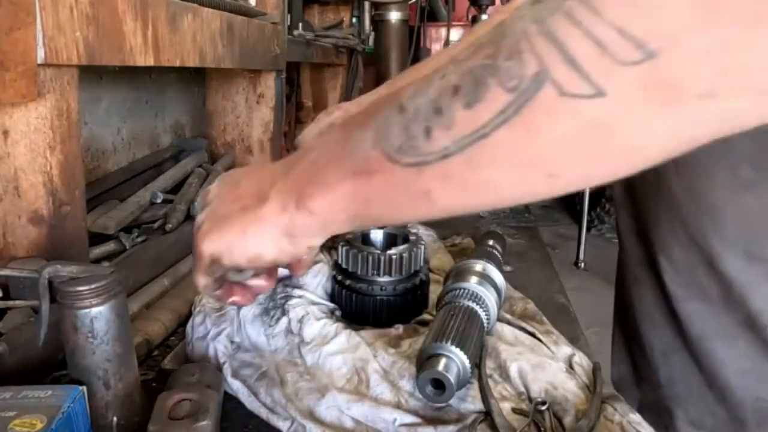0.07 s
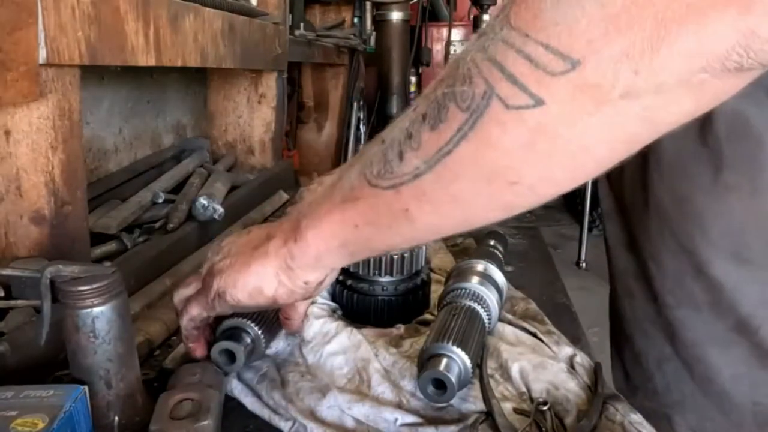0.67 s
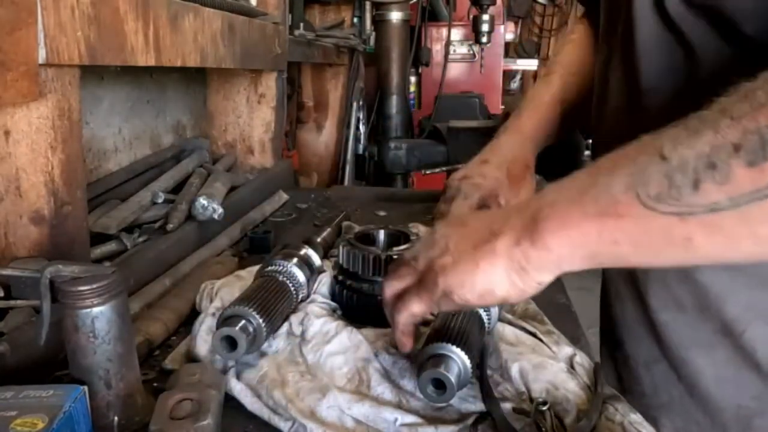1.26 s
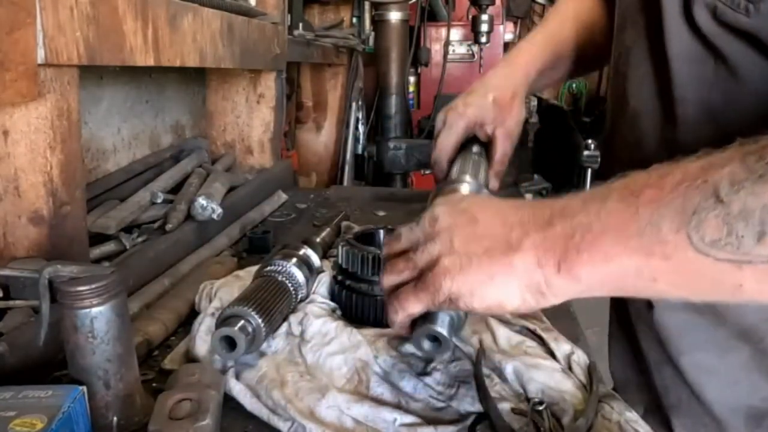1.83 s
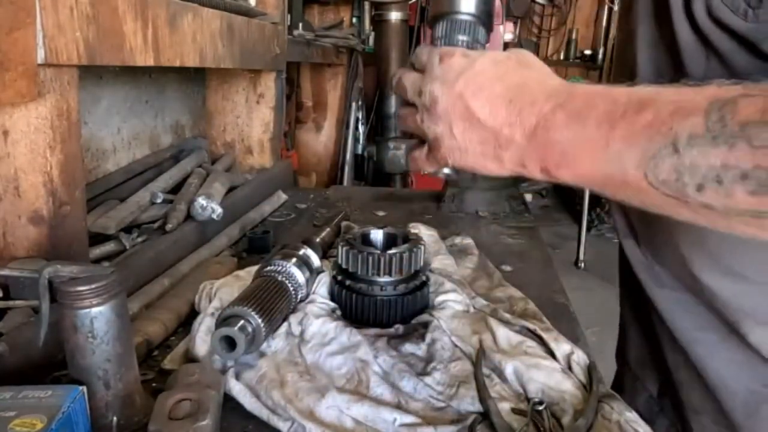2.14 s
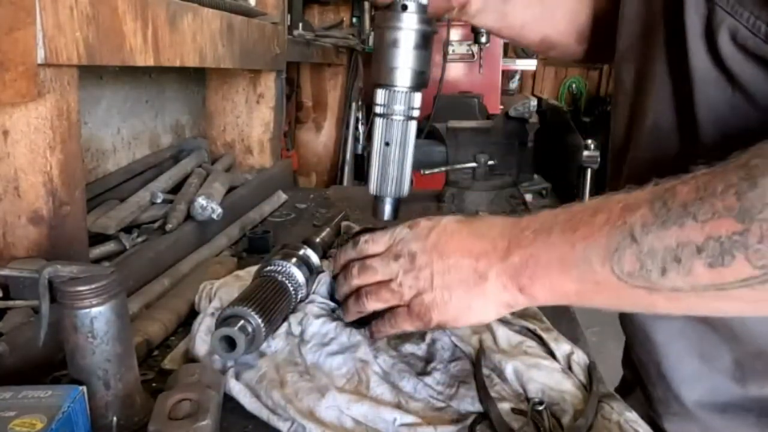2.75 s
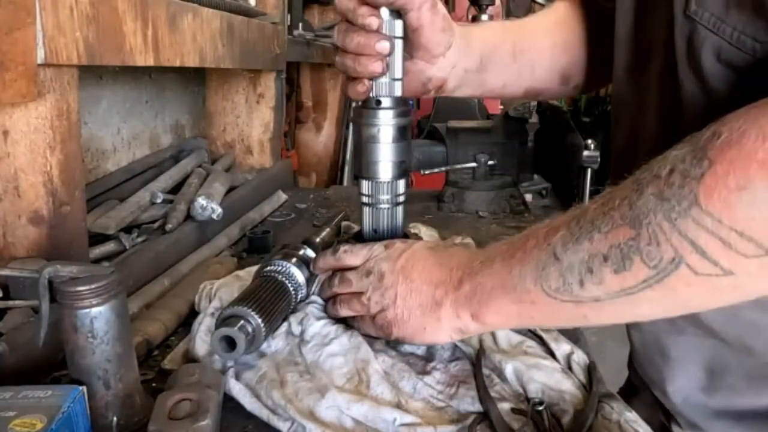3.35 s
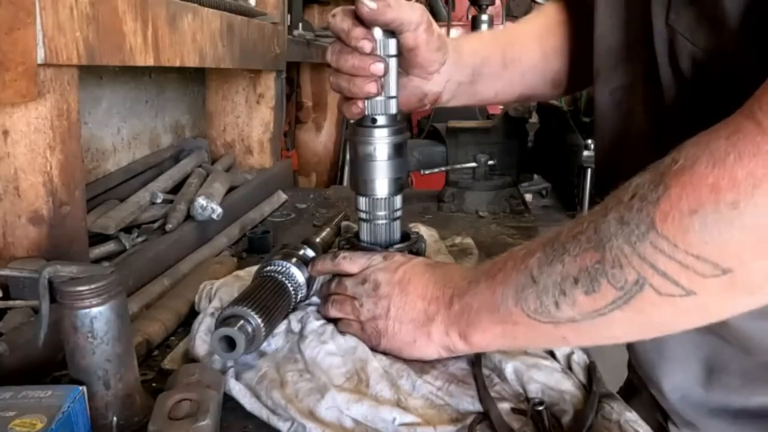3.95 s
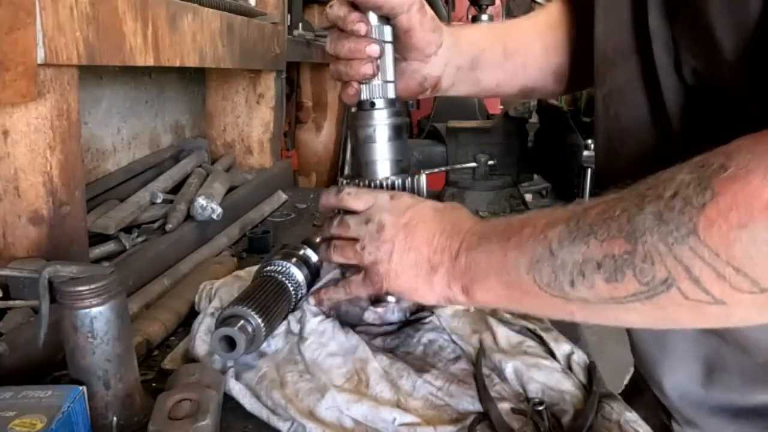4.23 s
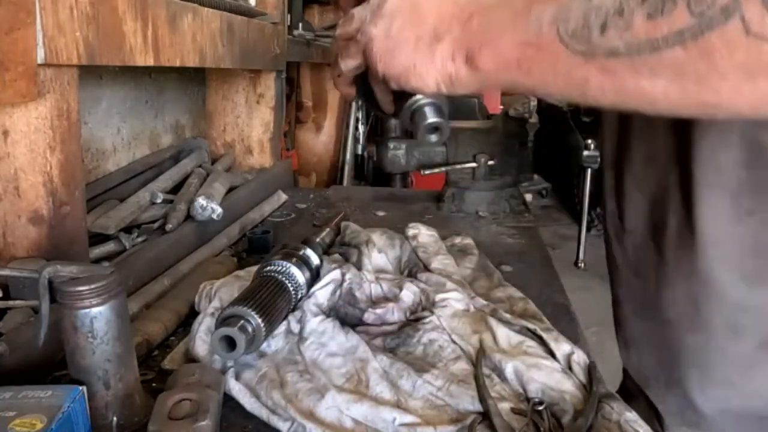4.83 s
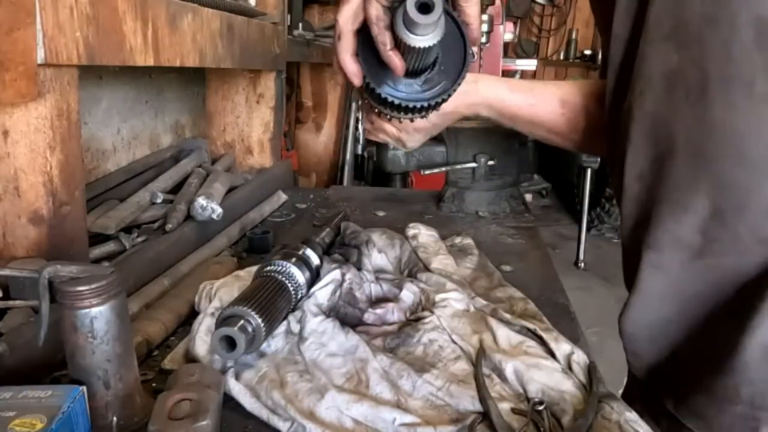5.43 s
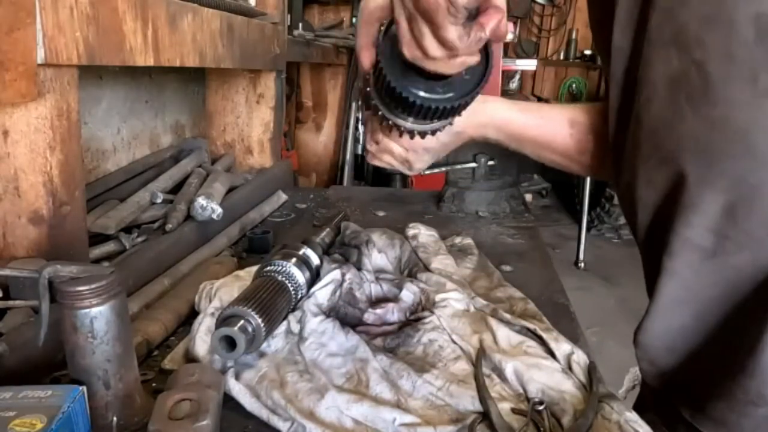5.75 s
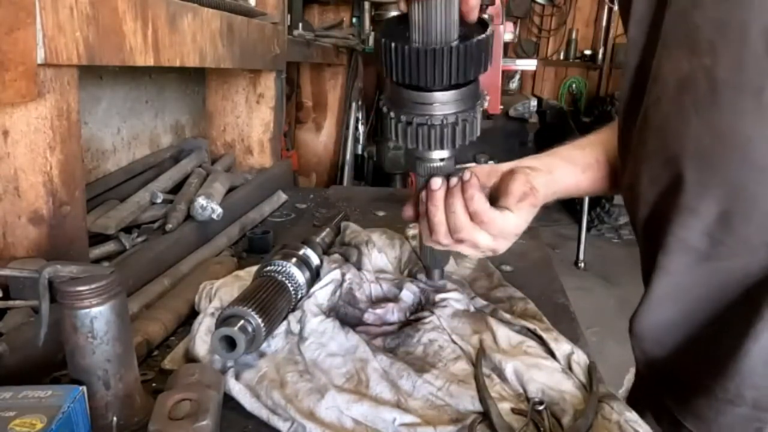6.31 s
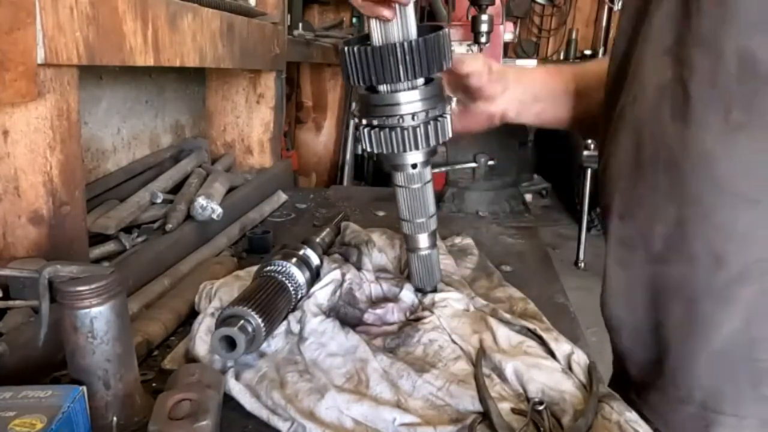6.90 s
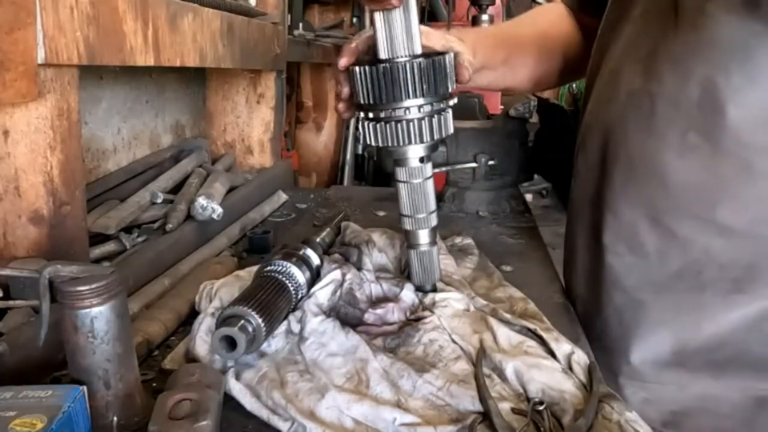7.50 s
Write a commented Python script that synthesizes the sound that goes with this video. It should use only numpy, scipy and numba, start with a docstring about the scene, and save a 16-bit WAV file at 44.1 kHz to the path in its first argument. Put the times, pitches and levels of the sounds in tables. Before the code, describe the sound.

Heavy steel parts thump on a workbench, then rattle, scrape and clink brightly as they are fitted together, close up.

```python
"""A loose steel gear chatters and rings on a splined shaft, slides home and clinks.
The shaft is set down on a rag-covered wooden bench, pushed into the gear, lifted and turned over.
Impacts ring the steel and boom the bench top; splines stick and slip; the shaft end grinds; hands rub.
Behind: low workshop hum, faint hiss. A close camera rides its gain and overloads on the hardest blows."""
import sys
import numpy as np
from scipy import signal
from scipy.fft import rfft, irfft, next_fast_len
from scipy.io import wavfile
from scipy.ndimage import uniform_filter1d, minimum_filter1d
from numba import njit

SR = 44100
rng = np.random.default_rng(int(sys.argv[2]) if len(sys.argv) > 2 else 0)


def wav_record(signal):
    """Record a signal, one row per channel, as 16-bit PCM in the file named by sys.argv[1]."""
    frames = np.transpose(np.atleast_2d(signal))
    bounded = np.clip(frames, -1, 1)
    # unit amplitude maps onto the largest positive 16-bit level
    quanta = np.round(bounded * 32767).astype(np.int16)
    wavfile.write(sys.argv[1], SR, quanta)


N = 333837
TIME_S = np.arange(N) / SR
AGE_S = TIME_S[:2 * SR]

# gear strikes on the splines: start_s, crack_db, ring_db
GEAR_STRIKES = [(1.623, -52, -48.5), (3.566, -8.5, -16), (4.121, -25.5, -39), (4.1342, -13.5, -22),
                (4.161, -18, -27.5), (4.178, -15.5, -7), (4.218, -13.5, -14), (4.236, -29.5, -4.5),
                (4.2564, 6.5, -3.5), (4.301, -15.5, -6.5), (4.317, -12.5, -2), (4.332, -16, 0),
                (4.368, -7, 6), (4.391, -9.5, -1.5), (4.407, -26, -9), (4.4435, -18.5, -9.5),
                (4.475, -15.5, -34), (5.516, -12.5, 4.5)]
# gear overtones: pitch_hz, level_db, base_t60_s
GEAR_OVERTONES = [(2713, -8, .06), (4095, -10, .08), (4124, 1, .22), (5640, -6, .03), (5728, -3, .09),
                  (5790, -5, .04), (6934, -22, .15), (7060, -24, .1), (7720, -35, .12), (10860, -42, .12)]
# gear on the rag, lifted, hanging, gripped: start_s, upper_twin_share, t60_factor, overtone_db
GEAR_HOLDS = [(0, .95, .96, -22), (4.1, 0.76, 0.92, -10.5), (4.25, .13, 1, -10), (4.44, 0.97, .15, -19.5)]
# seated parts clink: start_s, crack_db, ring_db, t60_factor
CLINKS = [(4.735, -28.5, -54.5, 0.52), (4.816, -26, -47, 0.4), (4.877, 3, -8.5, 0.25),
          (4.937, -8.5, 5.5, 0.4), (4.9425, -14, -15.5, 0.59), (5.186, -14.5, -7.5, 0.09),
          (5.5163, -3, -21.5, 0.64), (5.555, 1.5, -20.5, 0.96), (5.5977, -18, -20.5, 0.94),
          (5.9659, -26.5, -32, 0.86), (7.195, -43, -47, 0.89), (7.3619, -24, -38, 0.65),
          (7.4564, -17, -20, 0.65), (7.554, -33, -38, 0.87)]
# shaft with gear seated: pitch_hz, level_db, base_t60_s
ASSEMBLY_MODES = [(3900, -9, .18), (3941, 0, .45), (3984, -8, .2), (4161, -14, .15), (6815, -14, .25),
                  (7079, -18, .14), (7688, -15, .35), (8970, -17, .2), (10180, -28, .2), (12580, -24, .18)]
# runs of taps: start_s, end_s, first_db, last_db, typical_gap_s, ring_re_crack_db
RATTLES = [(5.648, 5.851, -31, -39.5, .028, -3), (7.3, 7.438, -35.5, -33.5, 0.015, -11.5),
           (7.465, 7.492, -19, -40.5, .015, -11)]
# single ringing pitches of struck steel: start_s, pitch_hz, level_db, t60_s
PINGS = [(1.075, 2364, -50, 0.3), (1.624, 7200, -39.5, .07), (4.478, 2250, -17, 0.054),
         (4.736, 1660, -38.5, .15), (5.516, 3270, -18.5, .03), (5.557, 7070, -11.5, 0.17),
         (5.557, 14130, -31.5, 0.13), (5.745, 9000, -41.5, .2)]
# steel slides: peak_s, level_db, rise_s, fall_s, slips_per_s, edge_hz, width_factor
SLIDES = [(2.16, -47, 0.18, .2, 2300, 5000, 1.8), (3.961, -45, 0.24, .14, 2800, 3043, 8.3),
          (4.3, -29, 0.22, 0.24, 950, 3240, 2.5), (4.851, -17.5, .035, .04, 1600, 8100, 0.71),
          (5.511, -32.5, 0.13, 0.05, 2100, 10070, 1.3)]
# sliding steel resonances: pitch_hz, base_width_hz, level_db
SLIDE_MODES = [(950, 270, -20.5), (1308, 110, -0.5), (1778, 100, 7), (2300, 340, -2), (2650, 160, -9.5),
               (4020, 290, 0), (5750, 150, -9.5), (6500, 980, -5), (7150, 400, -21), (9000, 300, -26.5),
               (10900, 390, -24)]
# landings on the bench: start_s, level_db, tilt_db_per_octave, rumble_db
THUMPS = [(0.58, 9.5, 5, -9.5), (1.067, -8.5, -2, -30), (1.634, -28.5, -11.5, -35.5),
          (3.561, -18, -7, -27.5), (4.181, -14.5, -1.5, -48), (6.549, -23, -9, -45), (7.451, -18, 11, -17),
          (7.489, -11.5, -5.5, -14.5), (7.56, -3.5, -6, -29)]
# bench top: pitch_hz, level_db, t60_s
BENCH_MODES = [(34.8, -24, 1), (54.8, -14.5, 0.67), (81, -15.5, 0.23), (144.1, -0.5, 0.22),
               (159.4, -6.5, 0.082), (210, -20, 0.22), (250, -26, 0.082), (355, -26, 0.057),
               (428, -25, 0.1)]
# dull steel knocks: start_s, level_db, t60_s
KNOCKS = [(0.5821, -0.5, 0.01), (0.585, -18, 0.11), (1.066, -44, 0.043), (1.622, -41.5, 0.027),
          (3.5584, -11, 0.043), (3.575, -17.5, 0.11), (3.952, -31.5, 0.015), (4.135, -22.5, 0.044),
          (4.16, -26, 0.076), (4.1788, -13, 0.054), (4.218, -19.5, 0.048), (4.3716, -25, 0.096),
          (4.877, -13.5, .03), (7.411, -36.5, 0.19), (7.477, -31, 0.08)]
# shaft end grinding: time_s, level_db
GRIND_LEVELS = [(6.6, -65), (7.1, -42), (7.26, -35), (7.33, -26.5), (7.42, -22.5), (7.5, -25), (7.57, -50)]
# hand strokes over rag and steel: peak_s, level_db, rise_s, fall_s
STROKES = [(0, -50.5, 0.046, 0.11), (.24, -47.5, 0.4, 0.13), (0.567, -42, 0.031, 0.044),
           (2.099, -47, 0.235, .33), (2.335, -42, .016, 0.069), (6.08, -56, 0.39, 0.44),
           (6.73, -54.5, 0.057, 0.075), (6.939, -56.5, .1, 0.6)]
# noise spectra: freq_hz, density_db
CRACK_SPECTRUM = [(200, -30.5), (600, -25), (1050, -7), (1600, 12.5), (3000, 5.5), (4200, 7.5),
                  (5200, -3.5), (7000, -2.5), (10000, -16.5), (16000, -15.5)]
KNOCK_SPECTRUM = [(80, -16.5), (200, -1), (420, -9), (600, -6), (900, 6.5), (1300, -1), (2200, -1.5),
                  (4000, -4.5), (5500, -15), (15000, -8)]
RUMBLE_SPECTRUM = [(20, -14), (40, -2), (80, 0.5), (130, -4.5), (165, -8), (230, -30), (400, -37),
                   (900, -56.5), (3000, -103)]
GRIND_SPECTRUM = [(22, -11), (55, -8), (110, -6), (160, 4), (250, -20.5), (420, -19.5), (700, -33),
                  (1700, -22), (3000, -45), (6000, -63.5)]
SKIN_SPECTRUM = [(500, -13.5), (1200, 7), (2500, 2), (4000, 2.5), (6500, 4.5), (8500, 0.5), (12500, -8.5),
                 (15500, -16)]
WALL_SPECTRUM = [(100, -2.5), (500, 3), (1200, 0.5), (2200, -4), (4000, -1), (5200, -2.5), (8000, -17.5),
                 (15000, -22.5)]
HUM_SPECTRUM = [(20, -4.5), (35, -1), (60, -4.5), (95, -8.5), (125, -10), (150, 5.5), (180, -5),
                (215, -2.5), (270, -17.5), (450, -23), (800, -61), (2500, -48.5)]
HISS_SPECTRUM = [(500, 0.5), (1500, 2), (3400, -7), (5000, -0.5), (6700, 3), (8500, -4), (10000, -1.5),
                 (11200, -7.5), (12400, 1.5), (14500, -18.5), (16000, -11)]


def loose_gear(twins_hz=(1749, 1796), base_t60_s=0.42, bounce_db=-9):
    """Bell-like ring of a split bending mode; the hold sets damping and the beating twins' balance."""
    out = np.zeros(N)
    for (start_s, crack_db, ring_db), gate in zip(GEAR_STRIKES, until_next(GEAR_STRIKES)):
        _, share, t60_factor, overtone_db = [hold for hold in GEAR_HOLDS if hold[0] <= start_s][-1]
        # phase runs on across strikes
        lower, upper = (np.sin(2 * np.pi * hz * (start_s + AGE_S)) for hz in twins_hz)
        twins = ((1 - share) * lower + share * upper) * fade(base_t60_s * t60_factor)
        overtones = ring(GEAR_OVERTONES, tilt_db_per_octave=12, t60_factor=0.38)
        overtones *= undb(0.7 * crack_db + overtone_db)
        add(out, start_s, gate * (undb(ring_db) * twins + overtones))
        edge_hz = 9000 * undb(0.57 * crack_db)  # harder blow: shorter contact, brighter crack
        add(out, start_s, undb(crack_db) * burst(CRACK_SPECTRUM, edge_hz, t60_s=0.019))
        # the ringing rim bounces twice
        delays_s = np.cumsum(0.0071 * rng.uniform(0.51, 0.92, size=2))
        for k, delay_s in enumerate(delays_s, start=1):
            bounce = burst(CRACK_SPECTRUM, edge_hz=1800, t60_s=0.033)
            add(out, start_s + delay_s, undb(min(crack_db, ring_db) + k * bounce_db) * bounce)
    return out


def clinks(tilt_db_per_octave=-5.5):
    """Seated parts hit their stops and ring high and thin; a firm grip shortens the ring."""
    out = np.zeros(N)
    contacts = sorted([tuple(row) for row in CLINKS] + rattle_taps())
    for (start_s, crack_db, ring_db, t60_factor), gate in zip(contacts, until_next(contacts)):
        edge_hz = 10600 * undb(0.63 * crack_db)  # harder is brighter
        add(out, start_s, undb(crack_db) * burst(CRACK_SPECTRUM, edge_hz, t60_s=0.024))
        add(out, start_s, undb(ring_db) * gate * ring(ASSEMBLY_MODES, tilt_db_per_octave, t60_factor))
    return out


def rattle_taps(gap_jitter=0.35, scatter_db=2, max_taps=12):
    """The gear rocks in its play: light, uneven taps, as CLINKS rows."""
    taps = []
    for start_s, end_s, first_db, last_db, gap_s, ring_re_crack_db in RATTLES:
        tap_s = start_s
        for stretch, force in rng.standard_normal((max_taps, 2)):
            if tap_s < end_s:
                crack_db = np.interp(tap_s, [start_s, end_s], [first_db, last_db]) + scatter_db * force
                taps.append((tap_s, crack_db, crack_db + ring_re_crack_db, 1))
            tap_s += gap_s * np.exp(gap_jitter * stretch)
    return taps


def pings():
    """Single ringing pitches of struck steel, mostly sounding with the strikes and clinks."""
    out = np.zeros(N)
    for start_s, pitch_hz, level_db, t60_s in PINGS:
        add(out, start_s, ring([(pitch_hz, level_db, t60_s)]))
    return out


def splines():
    """Stick-slip excites the steel; gentle slides are duller, a hand widens the resonances."""
    out = np.zeros(N)
    for peak_s, level_db, rise_s, fall_s, slips_per_s, edge_hz, width_factor in SLIDES:
        slips = grit(slips_per_s, scatter_db=2.5)[:SR]
        steel = sum(undb(db) * resonate(slips, hz, base_width_hz * width_factor)
                    for hz, base_width_hz, db in SLIDE_MODES)
        scrape = np.resize(unit(soften(steel, edge_hz)), N)
        out += undb(level_db) * swell(peak_s, rise_s, fall_s) * scrape
    return out


def bench_thumps(shiver_db=-40):
    """Heavy parts land: the top booms, loose things shiver, the frame rumbles on."""
    out = np.zeros(N)
    for start_s, level_db, tilt_db_per_octave, rumble_db in THUMPS:
        boom = ring(BENCH_MODES, tilt_db_per_octave) * (1 - fade(0.035))
        shiver = burst(KNOCK_SPECTRUM, edge_hz=2400, t60_s=0.27)
        rumble = noise(RUMBLE_SPECTRUM, len(AGE_S)) * fade(1.105) * (1 - fade(0.13))
        add(out, start_s, undb(level_db) * boom + undb(rumble_db) * rumble)
        add(out, start_s, undb(level_db + shiver_db) * shiver)
    return out


def knocks(dulling_s=0.077):
    """Steel knocks on a supported part; longer, softer knocks are duller."""
    out = np.zeros(N)
    for start_s, level_db, t60_s in KNOCKS:
        edge_hz = 3700 * np.exp(-t60_s / dulling_s)
        add(out, start_s, undb(level_db) * burst(KNOCK_SPECTRUM, edge_hz, t60_s))
    return out


def shaft_grind():
    """The shaft end grinds on the bench in tiny slips."""
    level_db = np.interp(TIME_S, *np.transpose(GRIND_LEVELS))
    return undb(level_db) * colour(grit(slips_per_s=590, scatter_db=0), GRIND_SPECTRUM)


def hands(catch_db=3):
    """Skin and cloth rub: soft hiss that swells and catches with the grip."""
    grip = unit(soften(soften(rng.standard_normal(N), edge_hz=23), edge_hz=23))
    speed = sum(undb(db) * swell(peak_s, rise_s, fall_s) for peak_s, db, rise_s, fall_s in STROKES)
    return speed * noise(SKIN_SPECTRUM) * undb(catch_db * grip)


def reflections(x, wet_db=-20, t60_s=0.28, side_db=-3, near_db=-24):
    """Cluttered walls return a short, dull tail; nearby tools scatter sound sideways."""
    tails = [noise(WALL_SPECTRUM, len(AGE_S)) * fade(t60_s) * (1 - fade(0.03)) for _ in range(2)]
    scatter = np.diff(soften(rng.standard_normal(len(AGE_S)) * fade(0.015), edge_hz=570))
    mid, side, near = (signal.fftconvolve(x, h / np.linalg.norm(h))[:N] for h in tails + [scatter])
    return stereo(undb(wet_db) * mid, undb(wet_db + side_db) * side + undb(near_db) * near)


def background(hum_db=-48, hiss_db=-56):
    """Low, wavering hum under steady hiss."""
    hum = stereo(noise(HUM_SPECTRUM), undb(-11.5) * noise(HUM_SPECTRUM))
    hiss = stereo(noise(HISS_SPECTRUM), undb(-5) * noise(HISS_SPECTRUM))
    return undb(hum_db) * hum + undb(hiss_db) * hiss


def undb(db):
    """Decibels to gain."""
    return 10 ** (np.asarray(db) / 20)


def unit(x):
    """Scale to rms 1."""
    return x / np.sqrt(np.mean(x ** 2))


def add(out, start_s, x):
    """Mix x in at start_s."""
    i = int(start_s * SR)
    out[i:i + len(x)] += x[:max(N - i, 0)]


def stereo(mid, side):
    """Mid/side to left/right."""
    return np.array([mid + side, mid - side])


def fade(t60_s):
    """Exponential decay."""
    return np.exp(-np.log(1000) * AGE_S / max(t60_s, 1e-3))


def swell(peak_s, rise_s, fall_s, sharpness=1.4):
    """A movement speeds up, peaks and stops."""
    ramp = np.interp(TIME_S, [peak_s - rise_s, peak_s, peak_s + fall_s], [0, 1, 0])
    return np.sin(np.pi / 2 * ramp) ** sharpness


def until_next(contacts, ramp_s=0.0022):
    """One gate per contact, open until the next takes over."""
    gaps_s = np.diff([row[0] for row in contacts] + [N / SR + 1])
    return [np.clip(np.minimum(AGE_S, gap_s + ramp_s - AGE_S) / ramp_s, 0, 1) for gap_s in gaps_s]


def ring(modes, tilt_db_per_octave=0, t60_factor=1):
    """Decaying modes of alternating sign, tilted about the strongest."""
    main_hz = max(modes, key=lambda mode: mode[1])[0]
    out = np.zeros(len(AGE_S))
    for k, (hz, db, t60_s) in enumerate(modes):
        gain = (-1) ** k * undb(db + tilt_db_per_octave * np.log2(hz / main_hz))
        out += gain * fade(t60_s * t60_factor) * np.sin(2 * np.pi * hz * AGE_S)
    return out


def burst(spectrum, edge_hz, t60_s):
    """Dense, short-lived modes as decaying noise; energy is independent of edge_hz."""
    size = SR // 4
    decay = fade(t60_s)
    x = soften(noise(spectrum, size) * decay[:size], edge_hz)
    return x * np.sqrt(np.sum(decay ** 2) / np.sum(x ** 2))


def grit(slips_per_s, scatter_db):
    """Slip impulses at random times, rms 1."""
    slips = (rng.random(N) < slips_per_s / SR) * rng.choice([-1, 1], N)
    return unit(slips * undb(scatter_db * rng.standard_normal(N)))


def noise(spectrum, size=N):
    """Coloured noise, rms 1."""
    return colour(rng.standard_normal(size), spectrum)


def colour(x, spectrum):
    """Shape x by a spectrum, rolled off past both ends; rms 1."""
    hz, db = np.transpose(spectrum)
    size = next_fast_len(len(x))
    bins_hz = np.arange(size // 2 + 1) * SR / size + 1e-3
    gain = undb(np.interp(np.log(bins_hz), np.log(hz), db))
    skirts = np.minimum(bins_hz / hz[0], 1) ** 2 * np.minimum(hz[-1] / bins_hz, 1) ** 2
    return unit(irfft(rfft(x, size) * gain * skirts, size)[:len(x)])


def resonate(x, pitch_hz, width_hz):
    """Steep resonance, gain 1 at centre."""
    b, a = signal.iirpeak(pitch_hz, pitch_hz / (2 * width_hz), SR)
    return signal.lfilter(b, a, signal.lfilter(b, a, x))


def soften(x, edge_hz):
    """Two-pole low-pass."""
    return signal.sosfilt(signal.butter(2, min(edge_hz, SR / 3), fs=SR, output="sos"), x)


@njit
def follow(x, attack_s, release_s):
    """Envelope follower."""
    envelope, level = np.empty(len(x)), 0.
    for i in range(len(x)):
        level += (x[i] - level) / (SR * (attack_s if x[i] > level else release_s))
        envelope[i] = level
    return envelope


def limit(x, ceiling=3.1, window_samples=65):
    """Look-ahead limiter, then a clip at full scale."""
    needed_gain = ceiling / np.maximum(np.abs(x).max(axis=0), ceiling)
    held_gain = minimum_filter1d(needed_gain, window_samples)
    return np.clip(x * uniform_filter1d(held_gain, window_samples), -1, 1)


def scene():
    """Close, centred bench work with reflections and background."""
    floor = background()
    work = hands() + splines() + bench_thumps() + knocks() + shaft_grind()
    work += loose_gear() + clinks() + pings()
    return work + reflections(work) + floor


def record(dry, knee_db=-14, squeeze=0.72, left_lag_s=1.6e-5, left_db=0.3, top_hz=16200):
    """The left port lags; gain control ducks after loud blows; peaks are limited, the top cut."""
    size = next_fast_len(N)
    lag_rad = 2 * np.pi * np.arange(size // 2 + 1) * SR / size * left_lag_s
    left = irfft(rfft(dry[0], size) * np.exp(-1j * lag_rad), size)[:N]
    ports = np.array([undb(left_db) * left, dry[1]])
    envelope = follow(np.abs(ports).max(axis=0), attack_s=0.025, release_s=0.78)
    gain = (1 + (envelope / undb(knee_db)) ** 2) ** (-squeeze / 2)
    low_pass = signal.ellip(8, 0.2, 70, top_hz, fs=SR, output="sos")
    return signal.sosfilt(low_pass, limit(ports * gain))


dry = scene()
out = record(dry)
wav_record(out)
```